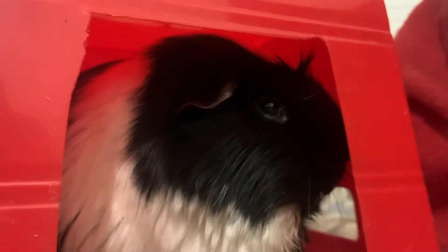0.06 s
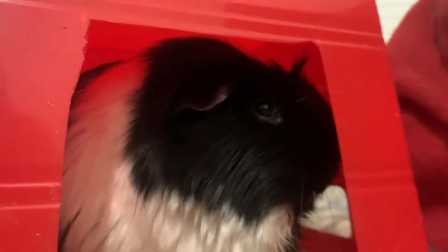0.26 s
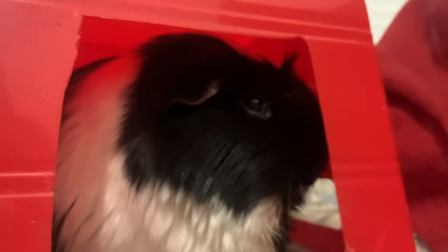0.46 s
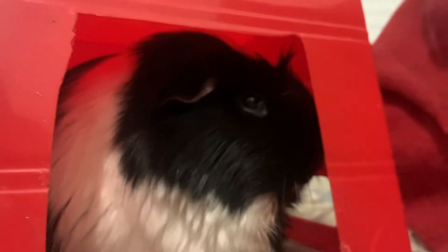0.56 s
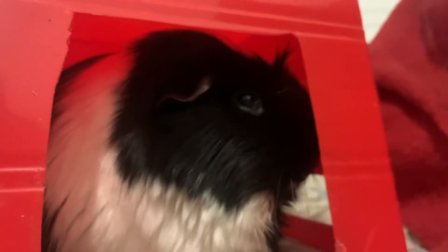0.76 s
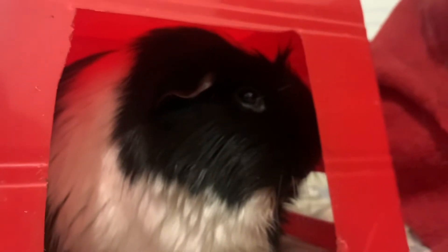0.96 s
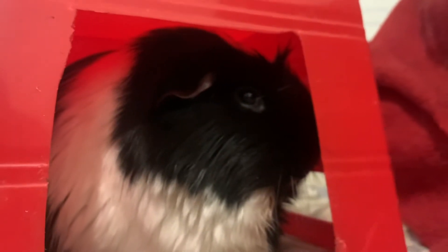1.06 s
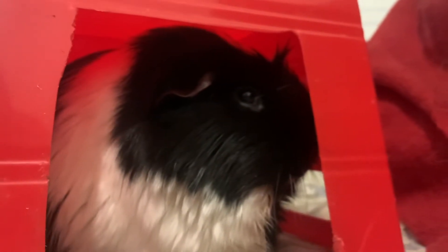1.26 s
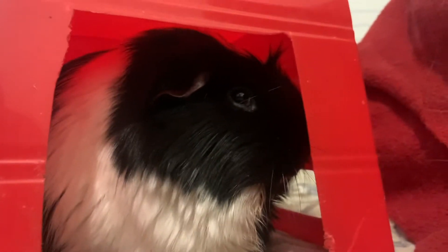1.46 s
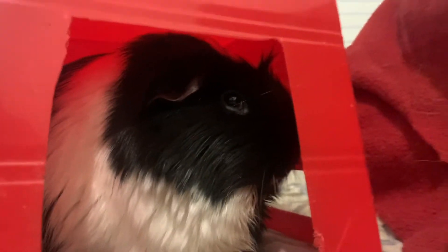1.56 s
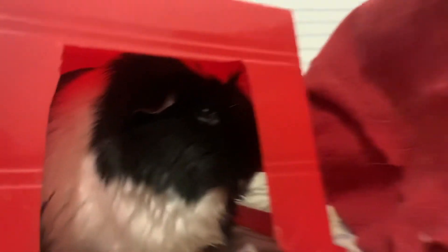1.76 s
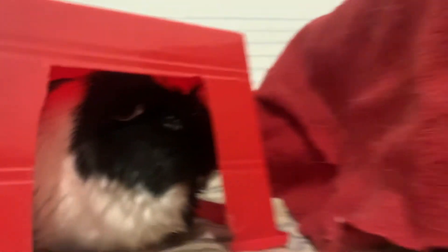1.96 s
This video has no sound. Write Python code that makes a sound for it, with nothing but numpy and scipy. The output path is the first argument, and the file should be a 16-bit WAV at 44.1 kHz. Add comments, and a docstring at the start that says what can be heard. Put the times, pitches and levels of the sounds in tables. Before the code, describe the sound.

Close up in a quiet room with a low hum, a guinea pig in a plastic hut gives two raspy, hooting breaths with faint sniffs between them. Then come a soft bump, a tiny tink and a brief rustle.

```python
"""A congested guinea pig

A guinea pig breathes in a plastic hut, close to the microphone. On each of two breaths, soft tissue
in its airway hoots near 255 Hz while mucus pops in it as a rasp; faint sniffs lie between.
A soft bump, a small metallic tink and a rustle follow, over a quiet room with mains hum."""
import sys
import numpy as np
from scipy import signal
from scipy.fft import rfft, irfft
from scipy.io import wavfile
from scipy.ndimage import uniform_filter1d

SR = 44100
rng = np.random.default_rng(int(sys.argv[2]) if len(sys.argv) > 2 else 0)


def generate_wav(signal):
    """Clip the signal to [-1, 1] and save it as 16-bit WAV at the path in sys.argv[1]."""
    frames = np.transpose(np.atleast_2d(signal))
    scaled = np.clip(frames, -1, 1) * 32767
    pcm = np.round(scaled).astype(np.int16)
    wavfile.write(sys.argv[1], SR, pcm)


N = 88200

# Levels in the tables are relative. A "colour" says how strong a sound is from bass to treble.
# The room's rumble and hiss: frequency_hz, level_db
ROOM_COLOUR = [(12, -47), (20, -14.5), (59, -1.5), (92, -6), (115, 1.5), (143, -4), (169, -1), (194, -10),
               (263, -5), (337, -10), (409, -21), (865, -31), (940, -29.5), (1270, -35), (1640, -42),
               (1880, -40.5), (2690, -46), (6360, -49), (10200, -44.5), (13800, -49.5), (15000, -56.5)]
# Room noise that differs between left and right, against what they share: frequency_hz, level_db
ROOM_WIDTH = [(60, -9), (200, -14), (380, -2), (690, 6), (1280, 3.5), (2360, -0.5), (4350, 1), (8020, 0),
              (14000, -23.5)]
# Soft knocks as the animal shifts: start_s, level_db
KNOCKS = [(0.423, -54.5), (0.821, -56), (1.581, -56), (1.601, -58.5), (1.966, -60.5)]
# The dull colour of a knock: frequency_hz, level_db
KNOCK_COLOUR = [(80, -17.5), (280, 10), (700, -2.5), (1300, -18), (2500, -55.5), (8000, -50.5)]
# Rustles of cloth and bedding: start_s, rise_s, decay_s, level_db
RUSTLES = [(1.496, 0.0067, 0.036, -67), (1.549, 0.028, 0.11, -70.5)]
# The colour of a rustle: frequency_hz, level_db
RUSTLE_COLOUR = [(400, 4), (1200, 4.5), (2500, -9.5), (3800, -6), (6500, -10), (9000, -24), (15000, -35)]
# The tones of a small metal piece: pitch_hz, level_db, ring_s (time to fade by 60 dB)
METAL_TONES = [(2040, -5, 0.12), (3550, 3, 0.049), (6870, 1, .05), (7090, -0.5, 0.1), (8520, -1, 0.09),
               (8760, -9, 0.071), (9820, -4, 0.11), (13280, -13, 0.072)]
# Thin whistles at the nostrils: centre_s, half_length_s, pitch_hz, level_db
WHISTLES = [(0.267, 0.0052, 6800, -79), (1.09, 0.013, 4140, -80), (1.272, 0.018, 4480, -86.5),
            (1.4, 0.00538, 6770, -80.5)]
# Sniffs of air at the nose: centre_s, half_length_s, level_db
SNIFFS = [(0.296, .02, -78), (0.511, .022, -73), (1.082, 0.027, -84.5), (1.281, 0.017, -70)]
# The colour of a sniff: frequency_hz, level_db
SNIFF_COLOUR = [(500, -5.5), (1200, 3.5), (2000, 4), (2700, -11.5), (3600, -5), (5200, -5.5), (7500, -18.5),
                (14000, -28.5)]
# The colour of a slow, soft flow of air: frequency_hz, level_db
SIGH_COLOUR = [(300, -17), (600, 2), (1150, -0.5), (1600, -14.5), (3000, -24.5), (9000, -40.5)]
# The course of each hoot, one list per breath: time_s, pitch_hz, level_db
HOOTS = [
    [(0.225, 235.1, -56), (0.245, 256, -41), (0.259, 252, -37), (0.265, 258.6, -42), (0.275, 323.7, -40.5),
     (0.289, 282.8, -42), (0.305, 254.6, -41.5), (0.331, 255, -35), (0.359, 256.1, -36.5),
     (0.381, 256, -36.5), (0.399, 242, -39), (0.412, 238.6, -46.5)],
    [(1.275, 222.3, -49), (1.295, 247.2, -46), (1.309, 252.1, -40), (1.319, 281.5, -32),
     (1.325, 271.7, -43), (1.341, 255.8, -41.5), (1.357, 257.8, -35), (1.379, 242.9, -40.5),
     (1.405, 262.8, -35.5), (1.435, 245.3, -38), (1.452, 233.7, -44)],
]
# The buzz in a hoot, at 2, 3 and 4 times its pitch: level_db
OVERTONES_DB = [-2, -16.5, -22.5]
# Mucus pops and the buzz each sets off: start_s, level_db, start_pitch_hz, buzz_level_db
POPS = [(.2326, -41.5, 1100, -63.5), (.2405, -39.5, 1550, -45.5), (.2562, -37.5, 1550, -45.5),
        (.2658, -41, 1400, -52), (.2703, -36, 1500, -41.5), (.3249, -32, 1550, -48.5),
        (.3568, -32.5, 1600, -49.5), (.3674, -30, 1550, -49), (.3732, -34, 1250, -51.5),
        (1.2833, -39, 1200, -60), (1.2914, -34.5, 1450, -47.5), (1.3075, -35.5, 1550, -57.5),
        (1.3145, -29.5, 1700, -44.5), (1.3405, -31, 1700, -45.5), (1.3841, -31, 1600, -46),
        (1.3943, -35.5, 1600, -52), (1.4003, -30.5, 1300, -44), (1.4045, -38, 1300, -54)]
# How the hut's resonances colour the pops: frequency_hz, level_db
HUT_COLOUR = [(100, -7.5), (250, -5.5), (320, 11), (430, 4.5), (540, -2), (690, -0.5), (840, 2),
              (970, -6.5), (1150, 2), (1350, -3.5), (2000, -1.5)]
# Echoes inside the hut: delay_s, left_db, right_db
HUT_ECHOES = [(.0045, -8.5, -12), (.0102, -8.5, -10.5)]
# How the airway is heard left against right: frequency_hz, left_minus_right_db
AIRWAY_BALANCE = [(100, -5.5), (260, 1), (450, -6), (700, -0.5), (1200, -8), (2400, -14.5)]


def undb(db):
    """Turn decibels into a number to multiply by."""
    return 10 ** (np.asarray(db) / 20)


def gains(colour):
    """Join (frequency_hz, level_db) points into a gain for every frequency."""
    hz, db = np.array(colour, float).T
    return undb(np.interp(np.log(np.fft.rfftfreq(N, 1 / SR) + 1), np.log(hz), db))


def noise(colour):
    """Noise with the given colour and a typical size of 1."""
    x = irfft(rfft(rng.standard_normal(N)) * gains(colour), N)
    return x / x.std()


def wobble(rate_hz):
    """A smooth random wobble with a typical size of 1."""
    width = max(int(SR / rate_hz), 2)
    x = uniform_filter1d(uniform_filter1d(rng.standard_normal(N), width), width)
    return x / x.std()


def since(start_s):
    """Seconds since the start, zero before it."""
    return np.maximum(np.arange(N) / SR - start_s, 0)


def swell(centre_s, half_length_s, level_db):
    """A level that rises and falls in a bell shape."""
    return undb(level_db) * np.exp(-((since(0) - centre_s) / half_length_s) ** 2)


def delay(x, lag_s):
    """The same sound, a little later."""
    t = since(0)
    return np.interp(t - lag_s, t, x, left=0)


def reverb(x, ring_s, level_db):
    """Many echoes blur into a stereo tail that fades by 60 dB in ring_s."""
    t = since(0)
    tail = rng.standard_normal((2, N)) * undb(-60 * t / ring_s) * (1 - np.exp(-t / .005))
    tail *= undb(level_db) / np.sqrt(np.sum(tail ** 2, axis=1, keepdims=True))
    return signal.fftconvolve(x[None], tail)[:, :N]


def room(hum_hz=120.45, hum_db=-73.5):
    """Low room rumble, microphone hiss and a wavering mains hum."""
    side = irfft(rfft(noise(ROOM_COLOUR)) * gains(ROOM_WIDTH), N)
    hum_level = np.sqrt(2) * undb(hum_db + 1.8 * wobble(1.9))
    hum = hum_level * np.sin(2 * np.pi * hum_hz * since(0) + 1.2 * wobble(1.3))
    return undb(-58.84) * (noise(ROOM_COLOUR) + np.array([side, -side])) + hum


def knocks(rise_s=.00108, decay_s=.0096):
    """The animal shifts and makes dull knocks, each a short burst of noise."""
    level = sum(undb(db) * (1 - np.exp(-since(start) / rise_s)) * np.exp(-since(start) / decay_s)
                for start, db in KNOCKS)
    return level * noise(KNOCK_COLOUR)


def bump(start_s=1.436, end_hz=58.9, drop_hz=71, drop_s=.008, decay_s=.016):
    """One low, soft bump whose pitch sinks as it fades."""
    age = since(start_s)
    cycles = end_hz * age + drop_hz * drop_s * (1 - np.exp(-age / drop_s))
    return undb(-37) * np.sin(2 * np.pi * cycles) * np.exp(-age / decay_s)


def rustles():
    """Cloth and bedding rustle in brief, slightly grainy bursts of noise."""
    level = sum(undb(db) * np.minimum(since(start) / rise, 1) * np.exp(-since(start + rise) / decay)
                for start, rise, decay, db in RUSTLES)
    grain = undb(.9 * wobble(170))
    return level * grain * np.array([noise(RUSTLE_COLOUR), noise(RUSTLE_COLOUR)])


def tink(start_s=1.504, rise_s=.0019, chatter_db=4):
    """A small piece of metal is touched and rings briefly, chattering against its mount."""
    age = since(start_s)
    offsets = rng.random((len(METAL_TONES), 2, 1)) / 2  # in cycles, for left and right
    ring = sum(undb(db - 60 * age / ring_s) * np.sin(2 * np.pi * (hz * age + offset))
               for (hz, db, ring_s), offset in zip(METAL_TONES, offsets))
    return undb(-66 + chatter_db * wobble(500)) * (1 - np.exp(-age / rise_s)) * ring


def whistles(waver_hz=140):
    """Air squeezes through a narrow nostril in brief, unsteady whistles."""
    drift = 2 * np.pi * np.cumsum(waver_hz * wobble(1000)) / SR
    return sum(swell(centre, half, db) * np.sin(2 * np.pi * hz * since(0) + drift)
               for centre, half, hz, db in WHISTLES)


def sniffs():
    """Air flows through the nose in short, faint sniffs, and one slow sigh before the second hoot."""
    quick = sum(swell(*sniff) for sniff in SNIFFS)
    sigh = swell(centre_s=1.16, half_length_s=.11, level_db=-72)
    return np.array([quick * noise(SNIFF_COLOUR) + sigh * noise(SIGH_COLOUR) for _ in range(2)])


def pops(end_hz=420, glide_s=.0013, rise_s=.0009, decay_s=.0026, cutoff_hz=1850):
    """Each film of mucus bursts with a chirp that falls within a few milliseconds."""
    chirps = np.zeros(N)
    for start, db, start_hz, _ in POPS:
        age = since(start)
        detune = 1 + .05 * rng.standard_normal()
        pitch_hz = (end_hz + (start_hz - end_hz) * np.exp(-age / glide_s)) * detune
        shape = (1 - np.exp(-(age / rise_s) ** 2)) * np.exp(-age / decay_s)
        chirps += undb(db) * shape * np.sin(2 * np.pi * np.cumsum(pitch_hz * (age > 0)) / SR)
    return signal.sosfilt(signal.butter(4, cutoff_hz, fs=SR, output="sos"), chirps)


def hoot(course, flutter_hz=150, flutter_db=1.2, buzz_decay_s=.021, fade_s=.014):
    """Airway tissue flutters in an almost pure tone; each pop sets its overtones buzzing briefly."""
    t = since(0)
    times, hz, db = np.array(course).T
    pitch_hz = np.interp(t, times, hz) * (1 + .028 * wobble(flutter_hz))
    phase = 2 * np.pi * np.cumsum(pitch_hz) / SR
    tone = undb(np.interp(t, times, db) + 1) * np.sin(phase)
    buzzes = [undb(buzz_db) * (t > start) * np.exp(-since(start) / buzz_decay_s)
              for start, _, _, buzz_db in POPS]
    buzz_level = uniform_filter1d(np.max(buzzes, axis=0), size=130)  # the strongest buzz, smoothed
    overtones = sum(undb(level) * np.sin(k * phase) for k, level in enumerate(OVERTONES_DB, start=2))
    fade = np.clip(np.minimum(t - times[0], times[-1] - t) / fade_s + 1 / 3, 0, 1)
    return np.sqrt(2) * (tone + buzz_level * overtones) * fade * undb(flutter_db * wobble(flutter_hz))


def airway():
    """Hoots and pops together: the pops bounce around the hut, and both echo in the room beyond."""
    rasp = irfft(rfft(pops()) * gains(HUT_COLOUR), N)
    direct = rasp + sum(hoot(course) for course in HOOTS)
    bounces = sum(undb([[left], [right]]) * delay(rasp, lag) for lag, left, right in HUT_ECHOES)
    hut_tail = reverb(rasp, ring_s=.08, level_db=-12.5)
    room_tail = reverb(direct, ring_s=.3, level_db=-20.5)
    breaths = direct + bounces + hut_tail + room_tail
    lean = np.sqrt(gains(AIRWAY_BALANCE))
    left, right = irfft(rfft(breaths) * np.array([lean, 1 / lean]), N)
    return np.array([delay(left, lag_s=.00028), right])  # the sound reaches the right side first


def scene():
    """The animal's breaths, its small sounds a little to the right, and the room."""
    small_sounds = sniffs() + whistles() + rustles() + knocks() + bump() + tink()
    return airway() + small_sounds * undb([[-2], [2]]) + room()


def record(dry, low_hz=30.7, top_hz=14800):
    """Cut away the deepest bass and the highest treble."""
    dry = signal.sosfilt(signal.butter(4, low_hz, "high", fs=SR, output="sos"), dry)
    return signal.sosfilt(signal.ellip(8, .2, 70, top_hz, fs=SR, output="sos"), dry)


dry = scene()
out = record(dry)
generate_wav(out)
```